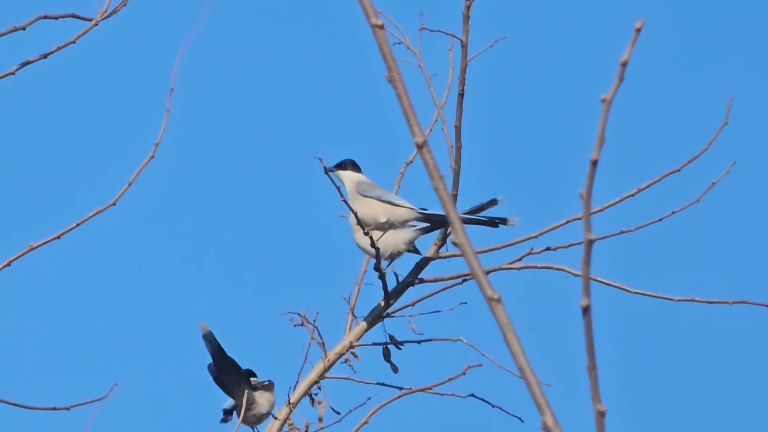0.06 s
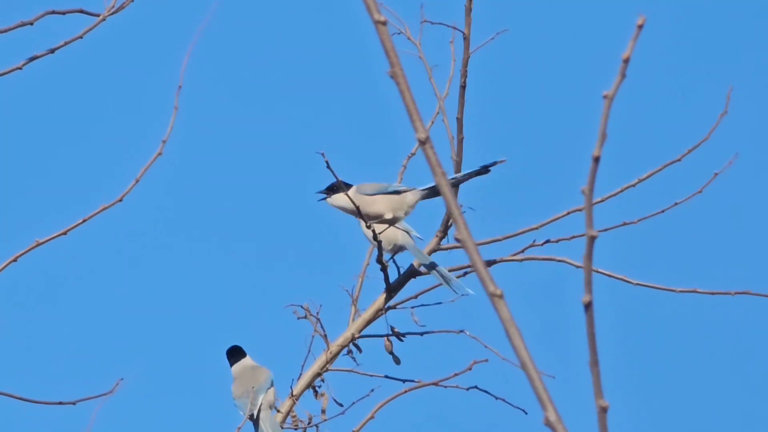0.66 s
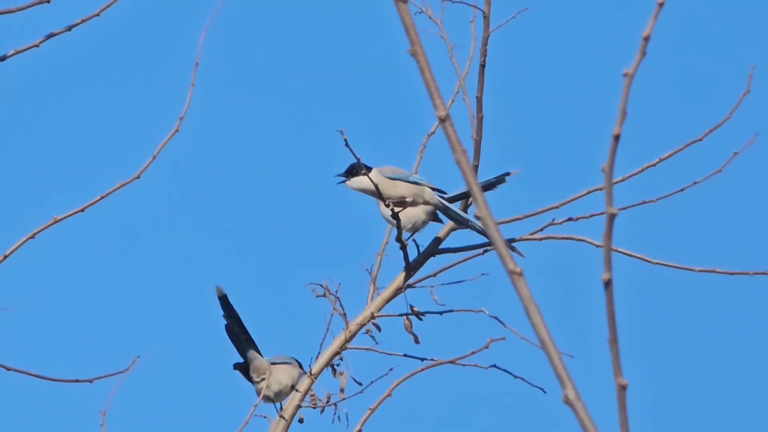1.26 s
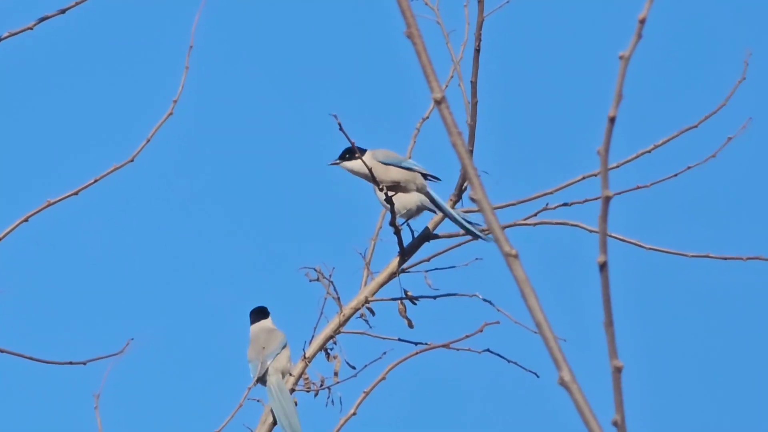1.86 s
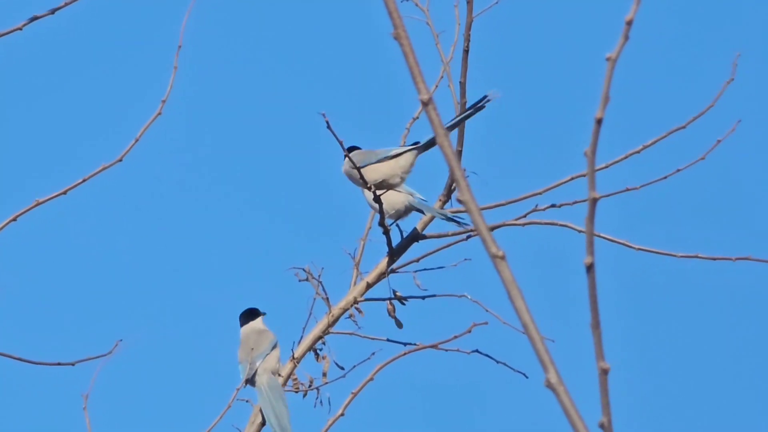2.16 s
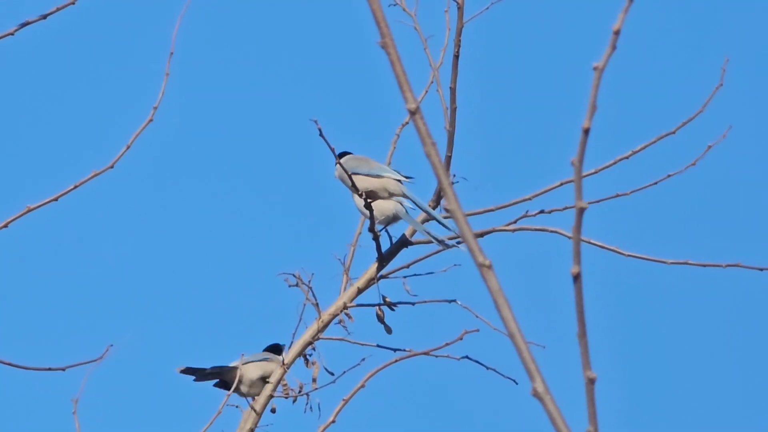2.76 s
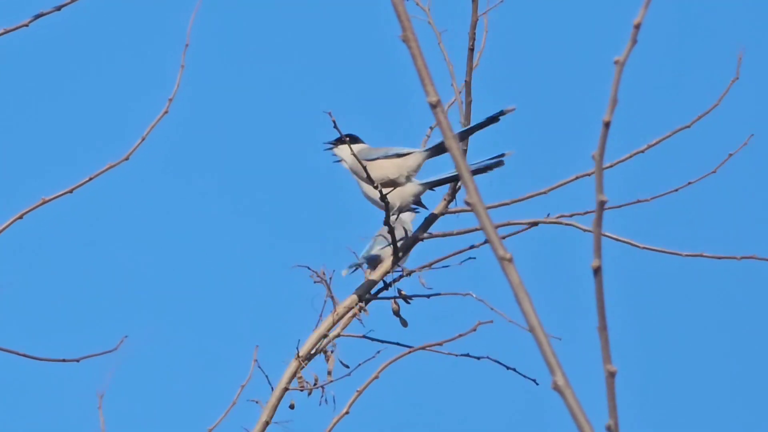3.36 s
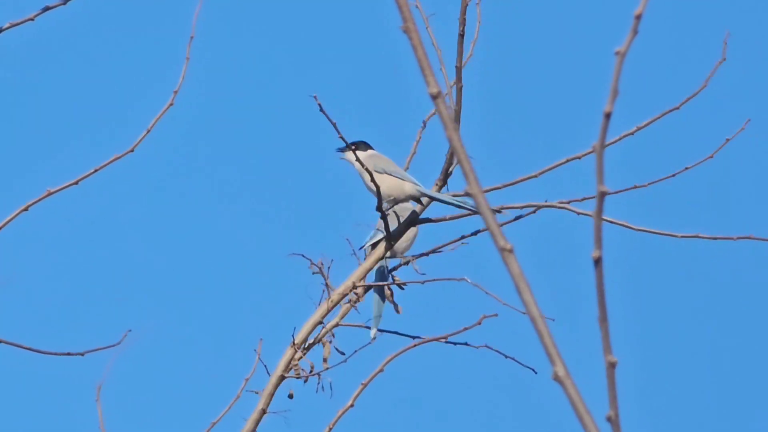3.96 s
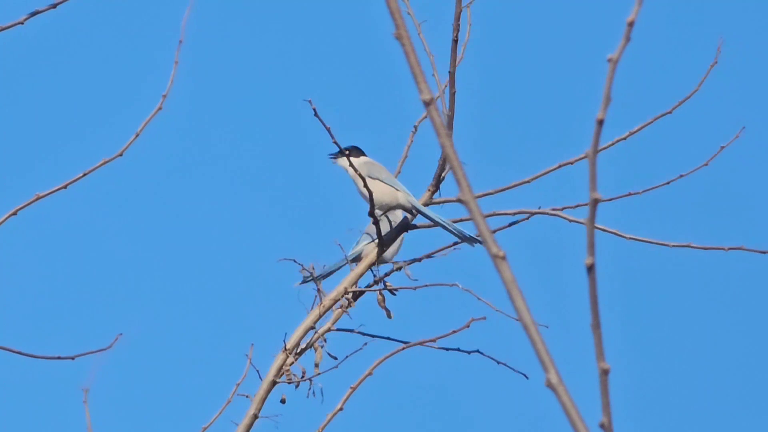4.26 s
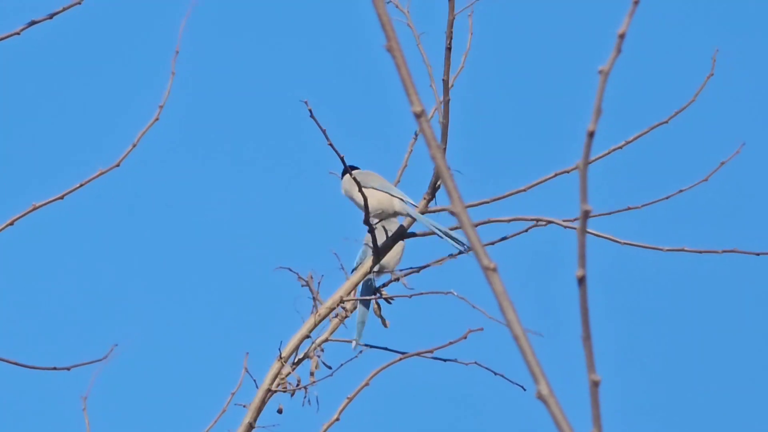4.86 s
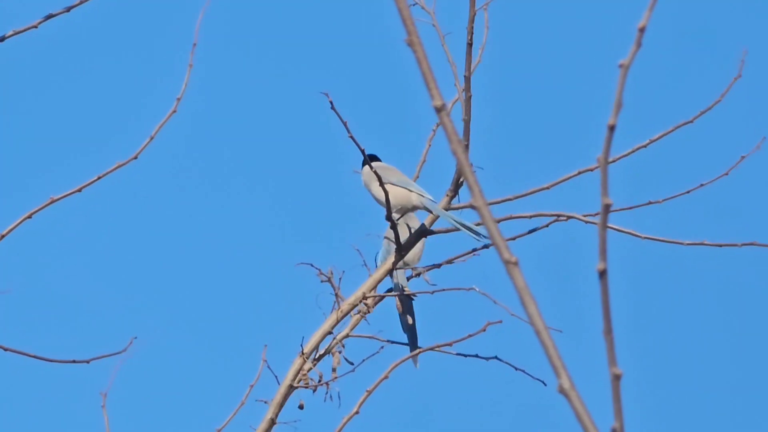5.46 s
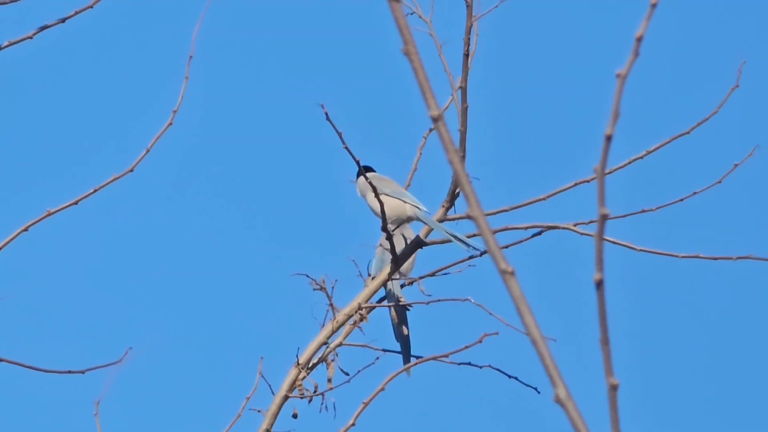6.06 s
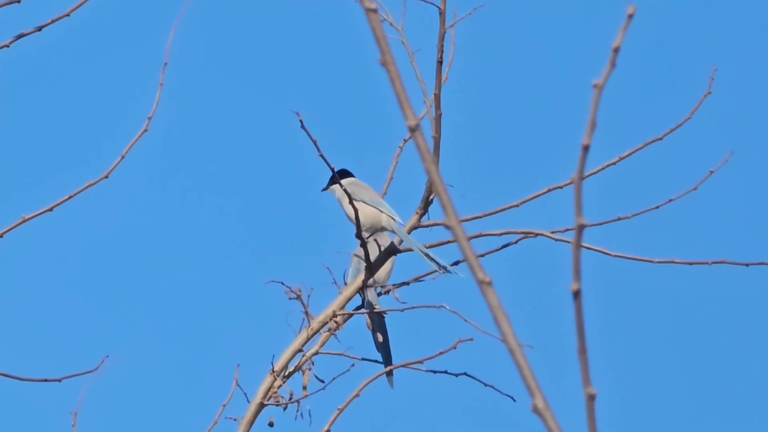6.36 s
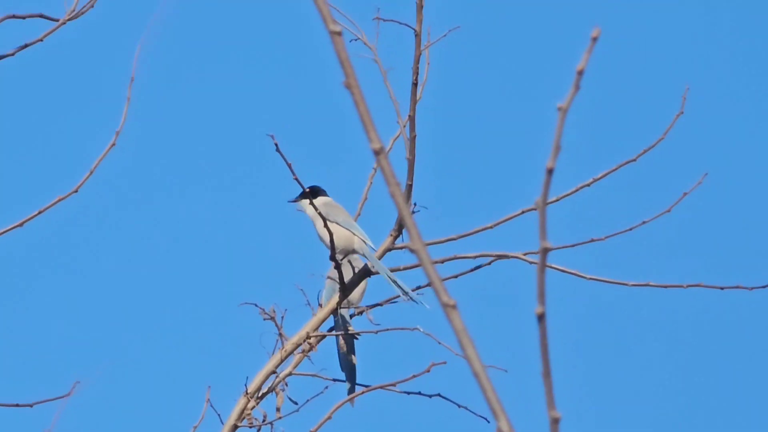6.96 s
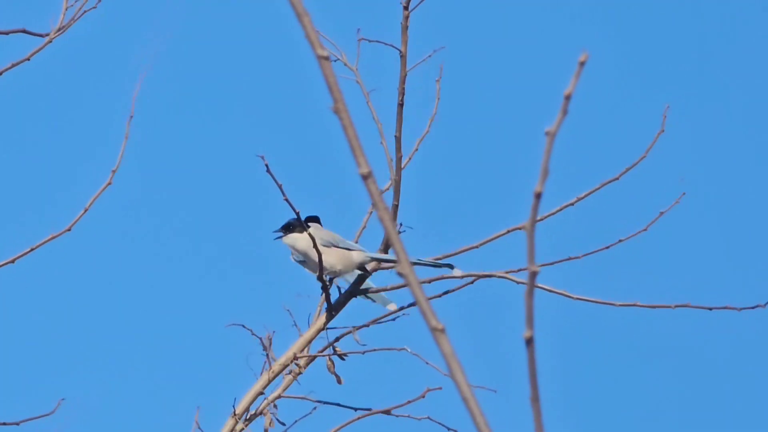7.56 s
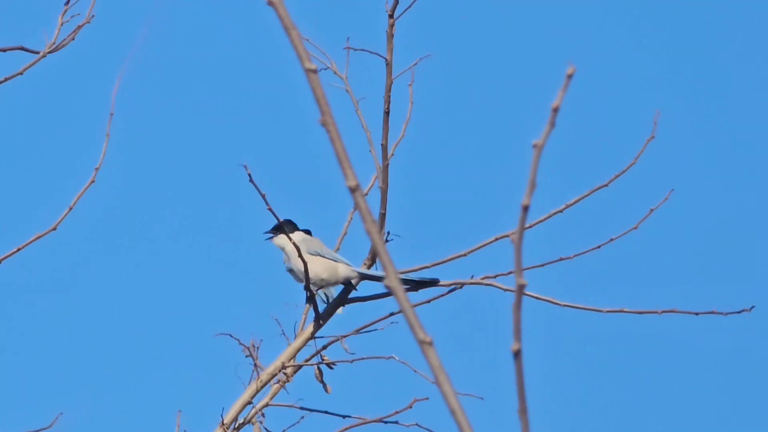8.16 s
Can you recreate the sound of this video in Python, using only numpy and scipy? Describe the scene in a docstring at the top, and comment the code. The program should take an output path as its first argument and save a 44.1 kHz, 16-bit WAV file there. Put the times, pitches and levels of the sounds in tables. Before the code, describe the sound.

Magpies call outdoors in quick, squeaky chirps and long grating rasps while a breeze buffets the microphone and far-off traffic hums.

```python
"""Short arched chirps over long buzzing rasps: a flock of azure-winged magpies chatters in bare trees.
Each chirp comes from both sides of the syrinx at once, each rasp is a train of throat pulses,
and one side alone slips thin notes in between. Trunks and ground echo the birds.
Wind buffets a phone's two microphone ports over the rumble of distant traffic."""
import sys
import numpy as np
from scipy import signal
from scipy.fft import rfft, irfft, next_fast_len
from scipy.io import wavfile
from scipy.ndimage import uniform_filter1d, map_coordinates

SR = 44100
rng = np.random.default_rng(int(sys.argv[2]) if len(sys.argv) > 2 else 0)


def waveform_to_disk(signal):
    """Save audio, clipped to [-1, 1], as 16-bit WAV at the path in sys.argv[1]."""
    frames = np.transpose(np.atleast_2d(signal))
    scaled = np.clip(frames, -1, 1) * 32767
    samples = np.round(scaled).astype(np.int16)
    wavfile.write(sys.argv[1], SR, samples)


N = 362502
TIME = np.arange(N) / SR
SIDES = np.array([[.5], [-.5]])  # splits a left-minus-right difference between the ports

# chirp cues: (time of the peak [s], bird, low voice's peak pitch [Hz], rise [s], level [dB], treble [dB])
CHIRPS = [(.058, "ahead", 3130, 0.058, -31, 7), (.169, "ahead", 2915, 0.05, -33, -12),
          (.255, "left", 3250, .062, -29.5, 7.5), (.335, "ahead", 2887, 0.075, -31, -17),
          (.366, "ahead", 3130, .054, -35.5, -4), (.497, "left", 3175, .055, -28, 1),
          (0.695, "ahead", 2780, 0.065, -36, -13), (.874, "ahead", 2960, 0.069, -34, -12),
          (0.995, "ahead", 2920, 0.066, -33, -4), (1.079, "ahead", 3000, 0.092, -32.5, -15),
          (1.15, "ahead", 3220, .054, -32.5, -4), (1.188, "far left", 3440, 0.073, -43, -3),
          (1.287, "ahead", 3040, 0.054, -29.5, -6.5), (1.362, "far left", 2790, 0.076, -39.5, -3),
          (1.482, "ahead", 3110, 0.059, -37, -5), (1.56, "far left", 3010, 0.068, -34, -3),
          (1.627, "ahead", 3040, 0.051, -39, -7), (1.683, "ahead", 3170, .06, -40, -8),
          (1.755, "left", 2940, 0.048, -36.5, 10), (1.873, "ahead", 3520, 0.051, -38.5, 1.5),
          (1.914, "clear", 2750, 0.044, -42.5, 6), (2.068, "hoarse", 3030, .062, -35, -5),
          (2.253, "far left", 2830, 0.076, -38.5, 1), (2.417, "far left", 2740, 0.055, -41.5, 1),
          (2.465, "far left", 2700, 0.034, -39.5, 3), (2.572, "left", 2800, 0.051, -35, -6.5),
          (2.614, "far left", 3260, 0.06, -35.5, 3.5), (2.775, "far left", 3310, 0.057, -34, -0.5),
          (2.895, "clear", 2910, 0.055, -34.5, 1), (2.941, "far left", 3290, 0.049, -32, .5),
          (3.046, "ahead", 3150, .061, -30.5, -1.5), (3.104, "far left", 2760, 0.05, -37, -3),
          (3.146, "far left", 3315, 0.044, -31.5, 0), (3.214, "ahead", 3070, 0.072, -31.5, -3),
          (3.262, "far left", 2810, 0.057, -37.5, 0), (3.372, "ahead", 3064, 0.048, -29.5, -1),
          (3.48, "far left", 2730, 0.055, -37, -10), (3.567, "ahead", 2890, 0.059, -29.5, -5),
          (3.78, "ahead", 2960, 0.062, -28.5, -4.5), (3.838, "ahead", 2975, 0.079, -34.5, -9),
          (3.925, "ahead", 3290, 0.052, -29.5, -6), (3.996, "ahead", 2977, 0.069, -32.5, -9),
          (4.085, "ahead", 3305, .06, -31, -2.5), (4.168, "ahead", 3020, .07, -35.5, -11),
          (4.213, "ahead", 3090, 0.065, -34, -10), (4.263, "ahead", 3375, .06, -32, -4),
          (4.317, "left", 2790, 0.048, -35.5, 9), (4.346, "ahead", 2965, 0.066, -36, -27),
          (4.435, "ahead", 3380, 0.055, -31, -2.5), (4.491, "left", 3125, .055, -29, 8),
          (4.528, "left", 3110, .047, -25.5, -14), (4.61, "left", 3225, 0.046, -29, -6.5),
          (4.662, "left", 3270, 0.055, -30.5, 5.5), (4.731, "ahead", 3054, .062, -32, -8),
          (4.836, "left", 3240, 0.049, -27.5, -1.5), (5.01, "left", 3220, 0.055, -29, -1),
          (5.087, "far left", 3150, .05, -33.5, 1), (5.186, "left", 3190, 0.059, -31, 4.5),
          (5.709, "hoarse", 3125, 0.05, -39, -12), (5.874, "hoarse", 3075, 0.066, -37.5, -3.5),
          (6.045, "hoarse", 3410, 0.068, -37.5, -6), (6.16, "hoarse", 3180, 0.047, -45, -4),
          (6.233, "hoarse", 3450, 0.042, -38.5, -4), (6.312, "hoarse", 3090, 0.046, -43, -9),
          (6.482, "hoarse", 3250, 0.045, -40, -7), (6.663, "hoarse", 3300, 0.077, -40.5, -9),
          (6.835, "hoarse", 2761, 0.075, -43.5, -9), (7.225, "far left", 2660, .038, -44, -3),
          (7.299, "clear", 2836, 0.049, -46.5, -8), (7.381, "far left", 3230, 0.053, -36, -0.5),
          (7.55, "far left", 3130, 0.052, -35, 1), (7.73, "far left", 3330, .053, -35.5, 0),
          (7.923, "far left", 3240, 0.052, -39, 2)]
# each chirping bird's voice and perch, by name:
# (high over low pitch [ratio], opening note [dB], roughness [0-1], left minus right [dB], left lead [ms])
CHIRP_BIRDS = {"ahead": (1.2, 3, .4, -2.5, .033), "left": (1.185, 7.5, .33, -1, .215),
               "far left": (1.2, 1.5, .42, .5, .285), "hoarse": (1.34, 2, .65, 4.5, .125),
               "clear": (1.36, 6, .1, -4, 0)}
# the arch of a chirp: (time from the peak [rise times], pitch [share of peak], low voice [dB],
# high voice [dB], opening note [share])
CHIRP_ARCH = [(-1.14, .49, -32, -50, 1), (-.97, .51, -4, -22, 1), (-.68, .6, -3, -8, 1),
              (-.35, .8, -1, -3, 0), (-.17, .93, 0, -1, 0), (0, 1, 1, 1, 0), (.17, .97, -1, -1, 0),
              (.33, .87, -10, -8, 0), (.48, .76, -32, -30, 0)]
# partials of the two coupled voices: (low voice [multiple], high voice [multiple], level [dB])
CHIRP_PARTIALS = [(1, 0, -1), (2, 0, -1.5), (3, 0, -16), (4, 0, -11), (5, 0, -19), (6, 0, -17), (0, 1, 1),
                  (1, 1, -6), (0, 2, -14), (2, 1, -15), (1, 2, -18), (3, 1, -16), (2, 2, -18)]
# EQ of the throat and open beak: (frequency [Hz], gain [dB])
THROAT_EQ = [(1500, -22), (2000, -5), (2700, -4), (3600, -0.5), (4500, -1), (6200, -2), (8000, 1.5),
             (10200, -10.5), (11600, -2), (13000, -12.5), (15500, -14)]
# rasp cues: (start [s], bird, length [s], body level [dB], edge level [dB], swell start to end [dB])
RASPS = [(-.03, "harsh", 0.44, -36.5, -46, -1), (0.322, "harsh", .22, -31, -42, 5),
         (0.61, "harsh", 0.098, -31.5, -40, 4), (0.841, "harsh", 0.068, -32.5, -38, -6.5),
         (0.982, "harsh", 0.32, -30, -34.5, 1.5), (1.341, "harsh", 0.29, -32, -36, -3),
         (1.683, "left", 0.24, -42, -53, 0), (2.016, "left", .19, -42, -53, -6),
         (2.227, "left", 0.23, -41.5, -45.5, 0.5), (2.579, "dry", 0.12, -40.5, -50, 6),
         (2.716, "dry", 0.27, -37, -46, -3), (2.98, "dry", 0.41, -38, -54, 7.5),
         (3.393, "dry", .32, -32.5, -43, 2), (3.75, "harsh", 0.4, -32.5, -37, 1),
         (4.199, "harsh", 0.46, -36, -40, -5), (4.713, "harsh", 0.13, -42, -43.5, 5),
         (5.411, "left", 0.246, -48.5, -70, 13), (5.695, "left", 0.39, -45.5, -57, 1),
         (6.103, "left", 0.32, -45.5, -54, 3), (6.428, "left", 0.32, -40.5, -49, 2),
         (6.788, "left", 0.28, -37.5, -46.5, 1.5), (7.112, "left", 0.072, -43, -48.5, 2),
         (7.3, "left", 0.67, -55.5, -64.5, -1), (7.87, "quick", 0.39, -37.5, -44.5, 6.5)]
# each rasping bird's voice, by name: (pulse rate [Hz], throat ring [Hz], ring level [dB], left lead [ms])
RASP_BIRDS = {"harsh": (108.5, 2930, 1, .033), "dry": (124, 2800, -14, .03), "left": (131, 3100, -11, .28),
              "quick": (137.5, 3000, 2, .03)}
# low throat resonances, the body of a rasp: (frequency [Hz], gain [dB])
RASP_BODY_EQ = [(700, -34), (1400, -8.5), (1650, -14), (2000, -1.5), (2550, 7), (3050, 0), (3550, 6),
                (4200, -1), (5500, -12.5)]
# high throat resonances, its bright edge: (frequency [Hz], gain [dB])
RASP_EDGE_EQ = [(3300, -70), (4700, 5), (5600, 3), (6400, 3.5), (7100, 3.5), (8300, 5), (9800, -6.5),
                (11500, 0), (13000, -8), (15500, -5)]
# thin note cues: (start [s], length [s], start pitch [Hz], end pitch [Hz], level [dB])
THIN_NOTES = [(.739, 0.05, 4500, 5970, -49), (2.681, 0.16, 2460, 2540, -37.5),
              (2.831, .038, 3060, 2880, -28.5), (2.854, 0.025, 2950, 4000, -32),
              (4.894, .053, 5130, 4800, -50), (5.325, 0.022, 5000, 5380, -60),
              (5.662, 0.024, 2806, 3000, -39), (5.805, .02, 2700, 2970, -39),
              (5.933, 0.05, 2606, 2760, -38.5), (6.79, 0.29, 2840, 2850, -40.5),
              (7.244, .042, 2900, 4610, -44), (7.427, 0.025, 4920, 5500, -50)]
# the breeze on the ports: (time [s], level [dB])
BREEZE = [(0, -32.5), (.95, -35), (1.8, -30), (2.8, -35.5), (3.6, -35.5), (4.3, -31), (4.65, -33.5),
          (5.2, -30.5), (6.6, -30.5), (6.95, -33), (7.3, -29), (8.2, -29.5)]
# gust cues: (start [s], length [s], level [dB], left minus right [dB])
GUSTS = [(.34, 0.4, -26, -7.5), (1.193, 0.47, -25.5, -7), (5.094, 0.025, -27.5, -2), (6.68, 0.13, -31, -1),
         (8.074, 0.18, -25, -2)]
# the bass-heavy tone of the buffeting: (frequency [Hz], gain [dB])
WIND_EQ = [(18, -14), (39, -1), (54, 2.5), (80, -4.5), (119, -8), (145, -13), (180, -12), (245, -18),
           (326, -30), (410, -34), (520, -35.5), (680, -54), (1500, -80)]
# the bed of distant traffic: (time [s], level [dB])
TRAFFIC_LEVEL = [(0, -54.5), (1.3, -52.5), (2.1, -54), (2.7, -50), (3.5, -50), (5.2, -52.5), (6.1, -52.5),
                 (6.95, -50), (7.5, -53.5), (8.22, -49.5)]
# its dull wash: (frequency [Hz], gain [dB])
TRAFFIC_EQ = [(120, 0), (250, 3), (380, -3), (520, 0), (800, -1.5), (1050, -6), (1400, -5.5), (3000, -15),
              (6000, -23), (15000, -35)]
# distant engines droning, a higher hum first, then a lower one: (time [s], pitch [Hz], level [dB])
ENGINE_HUMS = [(0, 170, -60), (.8, 177.7, -42.5), (1.6, 168.7, -36), (2.1, 169.1, -53.5), (3.2, 173.6, -52),
               (4.2, 115.3, -51.5), (5.2, 120.1, -36.5), (6.4, 119.2, -42), (7.3, 113.6, -37.5),
               (8.2, 109.2, -40.5)]
# the treble colour both ports share: (frequency [Hz], gain [dB])
PORT_EQ = [(2600, 0.5), (3700, 0.5), (5000, 3.5), (8500, 0), (10800, -1), (15000, -1.5)]
# each port's own colour: (frequency [Hz], left minus right [dB])
PORT_BALANCE = [(1000, .5), (2400, 1.5), (3600, -2), (6300, -2.5), (7700, 1), (9200, 7), (11000, -0.5),
                (14000, -0.5)]


def chirp(peak_hz, ratio, rise_s, treble_db, opening_db, rough, flutter_db=3, hiss_db=-5, air_db=-13):
    """Two membranes sweep up and over together; coupling adds sum tones, and the throat shapes them."""
    arch_t, share, low_db, high_db, opening = np.transpose(CHIRP_ARCH)
    t = np.arange(arch_t[0], arch_t[-1], 1 / (rise_s * SR))  # in rise times, 0 at the peak
    size = len(t)
    pitch = peak_hz * uniform_filter1d(np.interp(t, arch_t, share), size=300, mode="nearest")
    low_hz, high_hz = (pitch * r * (1 + .04 * rough * wobble(692.6, size) + .0072 * wobble(90.8, size))
                       for r in (1, ratio))
    low_gain = undb(np.interp(t, arch_t, low_db + opening_db * opening))
    high_gain = undb(np.interp(t, arch_t, high_db))
    beak_db = treble_db - 16 * np.maximum(t, 0)  # the beak closes past the peak and dulls the fall
    tone = 0
    for low_multiple, high_multiple, db in CHIRP_PARTIALS:
        hz = low_multiple * low_hz + high_multiple * high_hz
        phase = 2 * np.pi * (np.cumsum(hz) / SR + rng.random())
        voice_gain = high_gain if high_multiple else low_gain
        beak = undb(beak_db * np.clip((hz - 3700) / 1000, 0, 1)) * (hz < SR / 2)
        flutter = undb(flutter_db * wobble(308.8, size))
        # turbulence smears hiss around each partial, more on the high ones
        hiss = rough * undb(hiss_db) * (hz / 3500) ** .59 * wobble(2600, size)
        tone += undb(db) * eq_gain(hz, THROAT_EQ) * beak * voice_gain * (flutter + hiss) * np.sin(phase)
    # air rushes through the open beak, strongest halfway up the sweep and in hoarse calls
    throat = eq_gain(np.fft.rfftfreq(size, 1 / SR), THROAT_EQ)
    air = irfft(rfft(rng.standard_normal(size)) * throat, size)
    air = unit(air * np.exp(-((t + .35) / .38) ** 2) * signal.windows.tukey(size, .2))
    air_gain = undb(air_db + treble_db / 2) * (1 + 4 * rough ** 2)
    return unit(unit(tone) + air_gain * air)


def chirps(trim_db=-.8, bright_db=.16, shift_ms=.024):
    """Every chirp in its bird's voice and from its perch, on which the bird shifts a little."""
    out = np.zeros((2, N + 2 * SR))  # a second of padding at each end
    for peak_s, bird, peak_hz, rise_s, db, treble_db in CHIRPS:
        ratio, opening_db, rough, pan_db, lead_ms = CHIRP_BIRDS[bird]
        opening_db += .39 * treble_db  # a wider beak also lets the opening note out
        voice = chirp(peak_hz, ratio, rise_s, treble_db + bright_db, opening_db, rough)
        lead_ms += shift_ms * rng.standard_normal()
        start = SR + int((peak_s + CHIRP_ARCH[0][0] * rise_s) * SR)
        out[:, start:start + len(voice)] += undb(db + trim_db) * pan(voice, lead_ms, pan_db)
    return out[:, SR:SR + N]


def rasp(rate_hz, ring_hz, ring_db, body_db, edge_db, sweep=.54, blip_share=.55, scatter_db=.4):
    """The syrinx pulses open; each puff is a falling blip and a burst of noise, over steadier hiss."""
    cycle = np.cumsum(rate_hz * (1 + .012 * wobble(60))) / SR % 1
    strength = undb(scatter_db * wobble(110))
    puff = np.minimum(cycle / .61, 1) * np.exp(-cycle / .33) * strength
    blip_hz = ring_hz * (1 + sweep * (blip_share / 2 - cycle) + .075 * wobble(300))
    blip_shape = np.sin(np.pi * np.minimum(cycle / blip_share, 1)) * strength
    blip = unit(blip_shape * np.sin(2 * np.pi * np.cumsum(blip_hz) / SR))
    burst = equalise(puff * rng.standard_normal(N), RASP_BODY_EQ)
    body = (burst + undb(ring_db) * blip) / np.hypot(1, undb(ring_db))
    edge = equalise((puff + .3) * rng.standard_normal(N), RASP_EDGE_EQ)  # air leaks between puffs
    return undb(body_db) * body + undb(edge_db) * edge


def rasps(first_db=-1.59, second_db=-4):
    """The birds take turns to lead; a second bird doubles each rasp from another tree at its own rate."""
    body, edge, voice = np.zeros(N), np.zeros(N), np.zeros((4, N))
    for start_s, bird, length_s, db, treble_db, swell_db in RASPS:
        shape = envelope(start_s, length_s, attack_s=.038, release_s=.041, swell_db=swell_db)
        body = np.maximum(body, undb(db) * shape)
        edge = np.maximum(edge, undb(treble_db) * shape)
        voice[:, max(int(start_s * SR), 0):] = np.array(RASP_BIRDS[bird])[:, None]
    body_db, edge_db = 20 * np.log10(np.array([body, edge]) + 1e-9)
    rate_hz, ring_hz, ring_db, lead_ms = uniform_filter1d(voice, size=1500, axis=1)
    first = rasp(rate_hz * (1 + .012 * wobble(3)), ring_hz, ring_db, body_db, edge_db)
    second = rasp(rate_hz=124 * (1 + .06 * wobble(2)), ring_hz=2600 * (1 + .07 * wobble(2.8)),
                  ring_db=-4, body_db=body_db, edge_db=edge_db - 5)
    return (undb(first_db) * pan(first, lead_ms, pan_db=.16)
            + undb(second_db) * pan(second, lead_ms=.323, pan_db=-.2))


def thin_notes(waver=.023, flutter_db=3, octave_db=-20):
    """One side of the syrinx alone gives a thin, wavering glide."""
    out = np.zeros(N + SR)
    for start_s, length_s, from_hz, to_hz, db in THIN_NOTES:
        size, start = int(length_s * SR), int(start_s * SR)
        hz = np.linspace(from_hz, to_hz, size) * (1 + waver * wobble(338, size))
        phase = 2 * np.pi * np.cumsum(hz) / SR
        tone = np.sin(phase) + undb(octave_db) * np.sin(2 * phase)
        swell = signal.windows.tukey(size, .5) * undb(flutter_db * wobble(239, size))
        out[start:start + size] += undb(db) * unit(swell * tone)
    return pan(out[:N], lead_ms=.24, pan_db=0)


def tree_echoes(birds, early_db=-6.5, early_decay_s=.01, tail_db=-15, t60_s=.3, treble_t60_s=.16):
    """Sparse reflections off nearby trunks and the ground, then a diffuse tail whose treble dies first."""
    t = TIME[:SR]
    noise = rng.standard_normal((2, SR))
    low = signal.sosfilt(signal.butter(2, 4200, fs=SR, output="sos"), noise)
    tail = low * undb(-60 * t / t60_s) + .5 * (noise - low) * undb(-60 * t / treble_t60_s)
    tail *= np.minimum(t / .015, 1)
    taps = rng.standard_normal((2, SR)) * (rng.random((2, SR)) < 1500 / SR)  # about 1500 a second
    early = taps * np.exp(-t / early_decay_s) * (t > .001)
    impulse = (undb(tail_db) * unit(tail) + undb(early_db) * unit(early)) / np.sqrt(SR)
    return signal.fftconvolve(birds, impulse, axes=1)[:, :N]


def wind(breeze_pan_db=-1.5, buffet_db=2):
    """A breeze rumbles on the ports; short gusts buffet them, mostly the right one."""
    breeze_db, = automation(BREEZE)
    force = undb(breeze_db + breeze_pan_db * SIDES)
    for start_s, length_s, db, pan_db in GUSTS:
        gust = undb(db + pan_db * SIDES) * envelope(start_s, length_s, attack_s=.019, release_s=.038)
        force = np.hypot(force, gust)
    return stereo_noise(WIND_EQ, side_db=-5) * force * undb(buffet_db * wobble(16))


def traffic(wash_trim_db=1, swell_db=1.65, flutter_db=3.6):
    """Far engines drone over a soft wash: a higher hum, then a lower one, each fading in and out."""
    wash_db, = automation(TRAFFIC_LEVEL)
    hum_hz, hum_db = automation(ENGINE_HUMS)
    phase = 2 * np.pi * np.cumsum(hum_hz * (1 + .056 * wobble(40))) / SR
    hum = unit(np.sin(phase) * undb(flutter_db * wobble(23)))
    wash = stereo_noise(TRAFFIC_EQ, side_db=-4.5)
    return wash * undb(wash_db + wash_trim_db + swell_db * wobble(3.003)) + undb(hum_db) * hum


def undb(db):
    """Decibels to gain."""
    return 10 ** (np.asarray(db) / 20)


def unit(x):
    """Scale to rms 1."""
    return x / np.sqrt(np.mean(x ** 2) + 1e-18)


def automation(table):
    """One curve per value column of a table whose rows start with a time."""
    times, *columns = np.transpose(table)
    return [np.interp(TIME, times, column) for column in columns]


def envelope(start_s, length_s, attack_s, release_s, swell_db=0):
    """Build up to the start, hold with a steady swell, then die away."""
    t = TIME - start_s
    outside = np.maximum(-t / attack_s, (t - length_s) / release_s)
    swell = undb(swell_db * (np.clip(t / length_s, 0, 1) - .5))
    return np.exp(-np.clip(outside, 0, 20)) * swell


def wobble(rate_hz, size=N):
    """Smooth random modulation with a spread near 1 and rate_hz new values a second."""
    steps = np.arange(size) * rate_hz / SR
    return map_coordinates(rng.standard_normal(int(steps[-1]) + 2), [steps], order=2, mode="nearest")


def eq_gain(hz, eq):
    """Gain of an EQ curve at the given frequencies."""
    eq_hz, db = np.transpose(eq)
    return undb(np.interp(np.log(hz + 1e-9), np.log(eq_hz), db))


def equalise(x, eq):
    """Filter by an EQ curve that rolls off beyond its ends, then scale to rms 1."""
    size = next_fast_len(N + 4096)
    hz = np.fft.rfftfreq(size, 1 / SR)
    rolloff = np.minimum(hz / eq[0][0], 1) ** 2 / np.maximum(hz / eq[-1][0], 1) ** 2
    return unit(irfft(rfft(x, size) * eq_gain(hz, eq) * rolloff, size)[..., :N])


def stereo_noise(eq, side_db):
    """Coloured mid/side noise, partly shared by the two ports."""
    mid, side = equalise(rng.standard_normal((2, N)), eq)
    return mid + undb(side_db) * side * np.array([[1], [-1]])


def pan(x, lead_ms, pan_db):
    """Place a bird: it reaches the left port lead_ms early, and pan_db is left minus right."""
    late = map_coordinates(x, [np.arange(len(x)) - lead_ms * SR / 1000], order=3)
    return np.array([x, late]) * undb(pan_db * SIDES)


def scene():
    """The flock up front, its echoes behind, and a bed of wind and traffic."""
    birds = chirps() + rasps() + thin_notes()
    return birds + tree_echoes(birds) + wind() + traffic()


def record(dry, cutoff_hz=15850):
    """Each port adds its own colour; the phone cuts the top."""
    size = next_fast_len(N + 4096)
    hz = np.fft.rfftfreq(size, 1 / SR)
    gain = eq_gain(hz, PORT_EQ) * eq_gain(hz, PORT_BALANCE) ** SIDES
    coloured = irfft(rfft(dry, size) * gain, size)[:, :N]
    return signal.sosfilt(signal.ellip(10, .2, 80, cutoff_hz, fs=SR, output="sos"), coloured)


dry = scene()
out = record(dry)
waveform_to_disk(out)
```